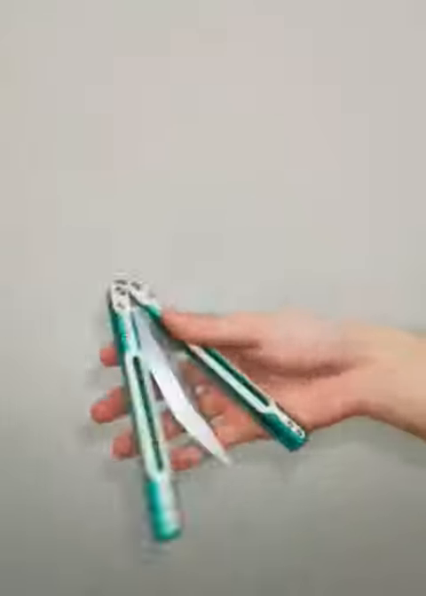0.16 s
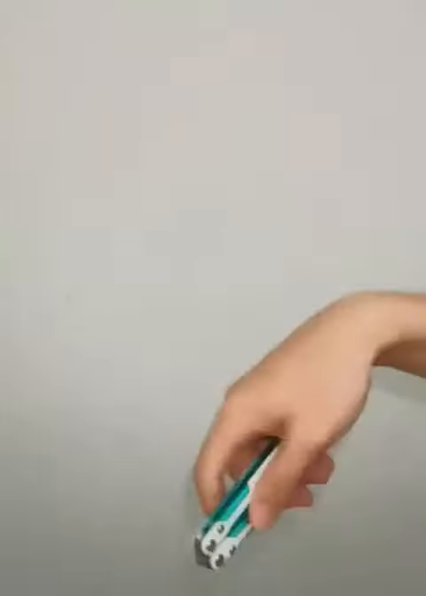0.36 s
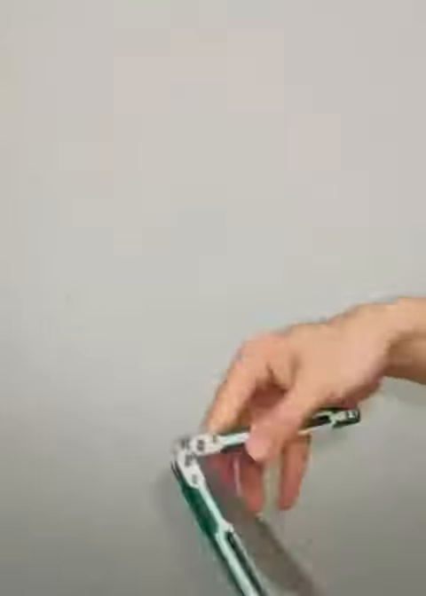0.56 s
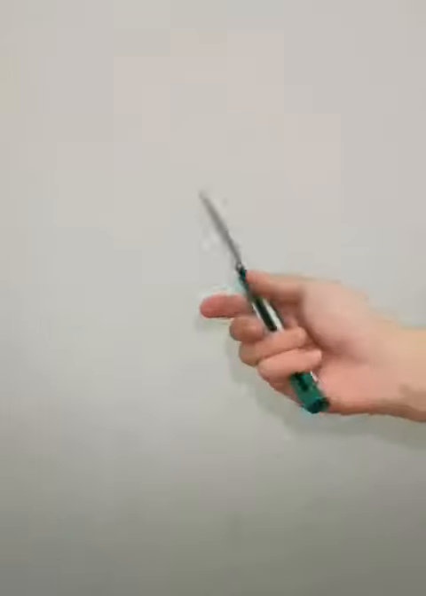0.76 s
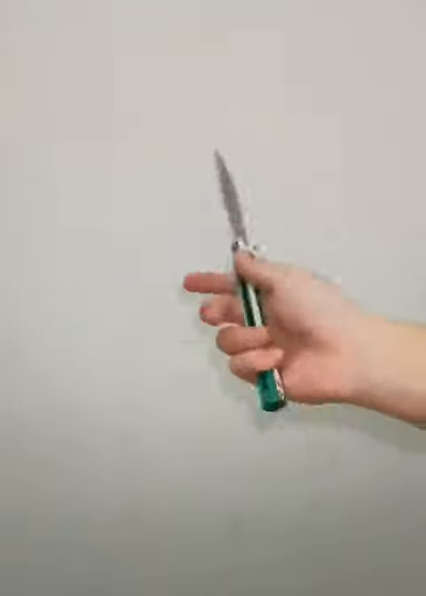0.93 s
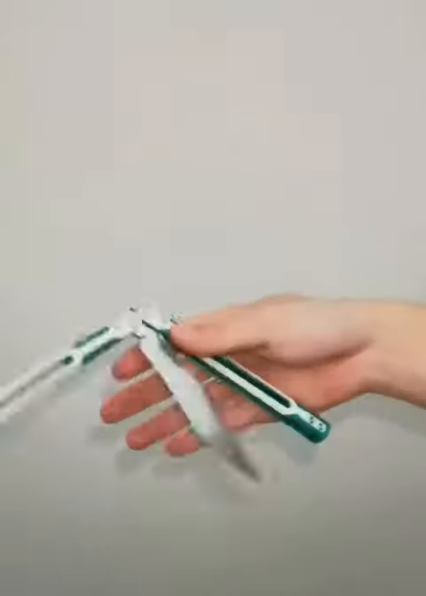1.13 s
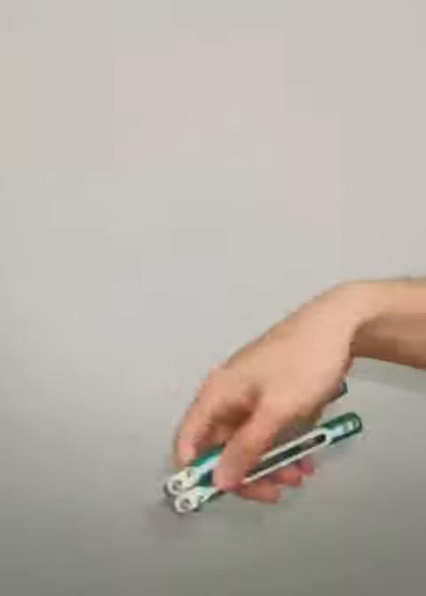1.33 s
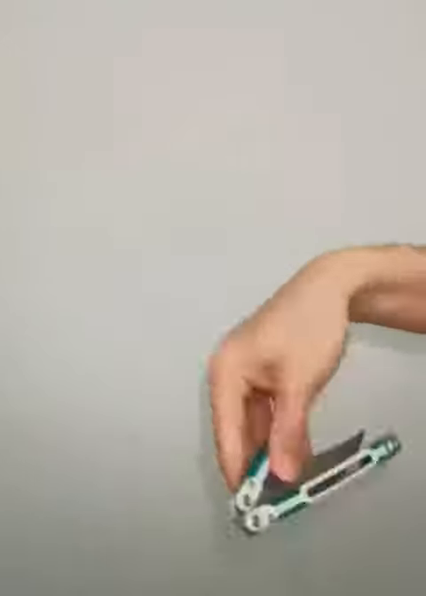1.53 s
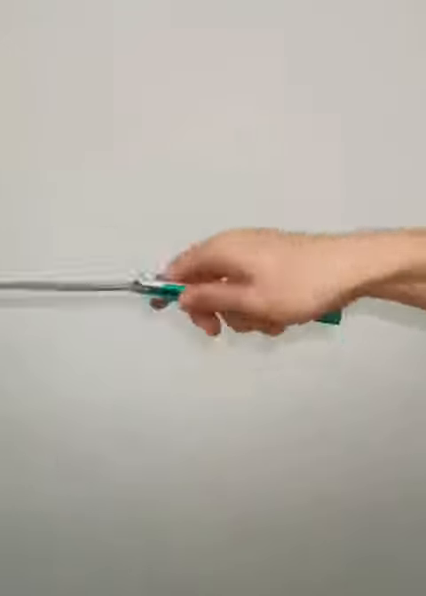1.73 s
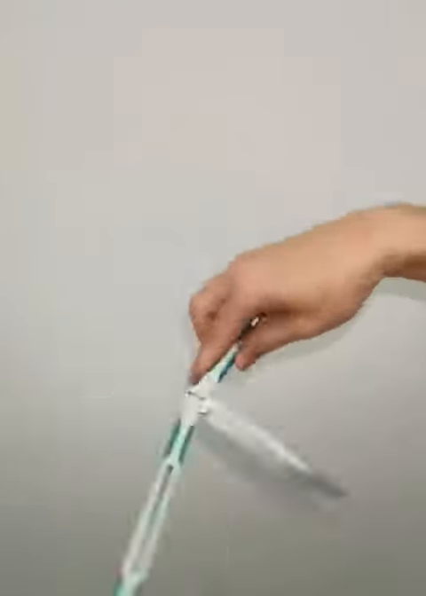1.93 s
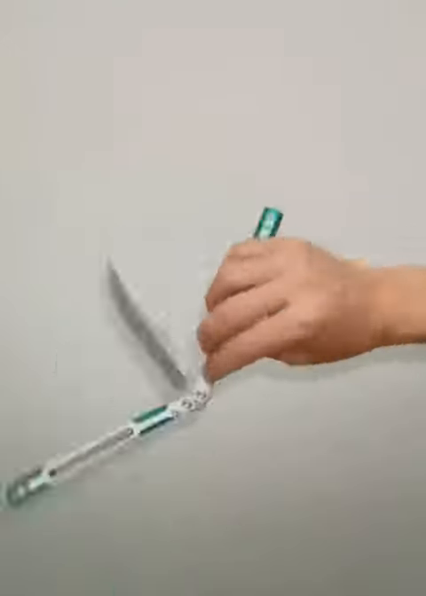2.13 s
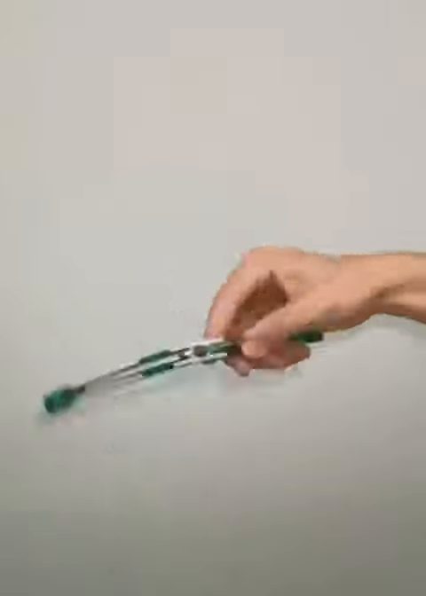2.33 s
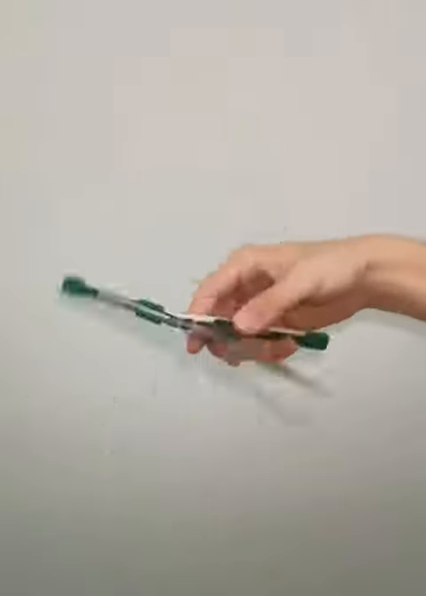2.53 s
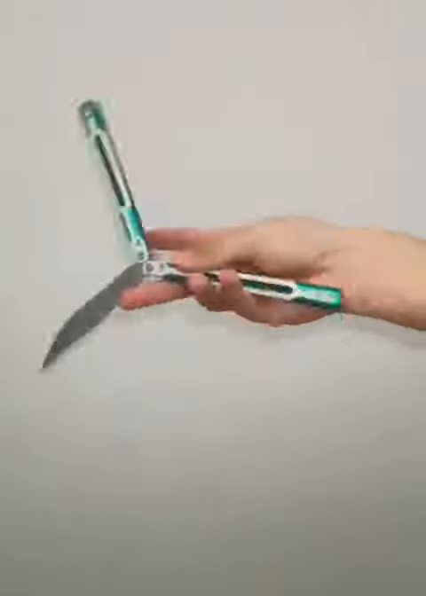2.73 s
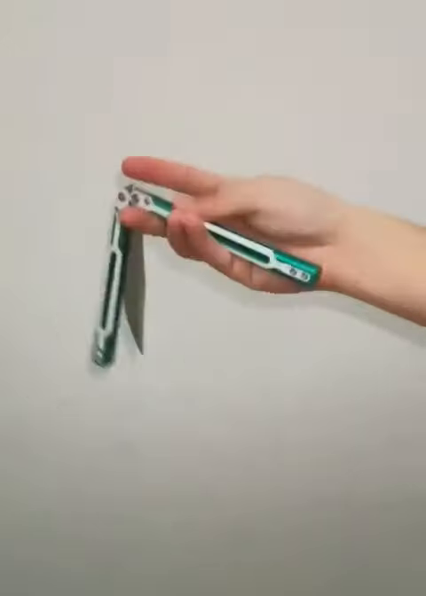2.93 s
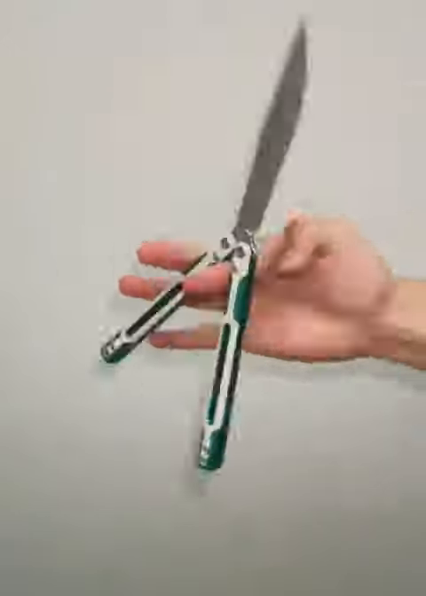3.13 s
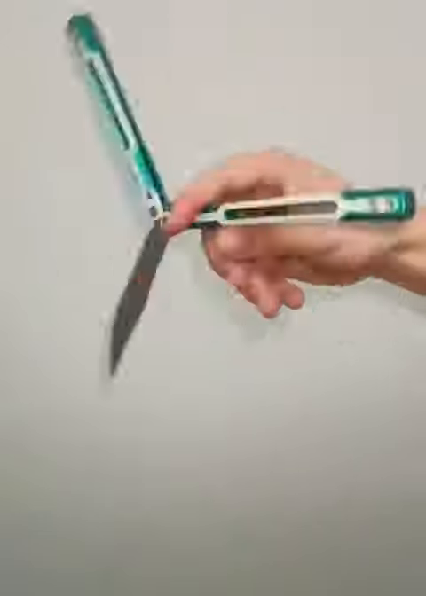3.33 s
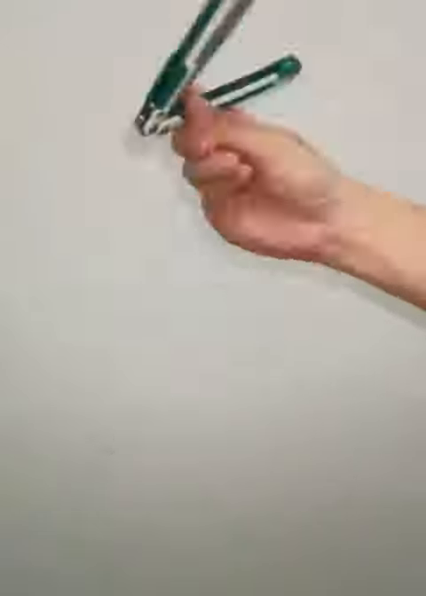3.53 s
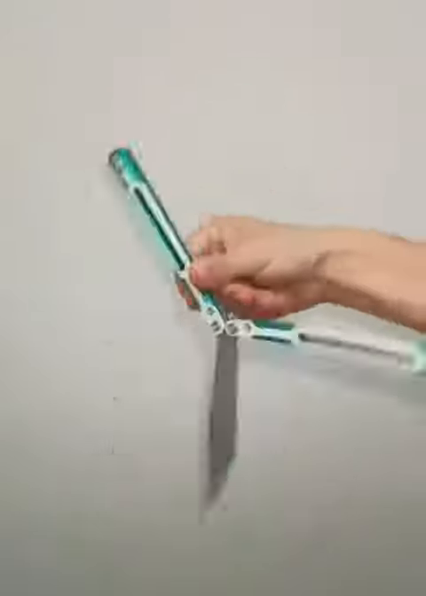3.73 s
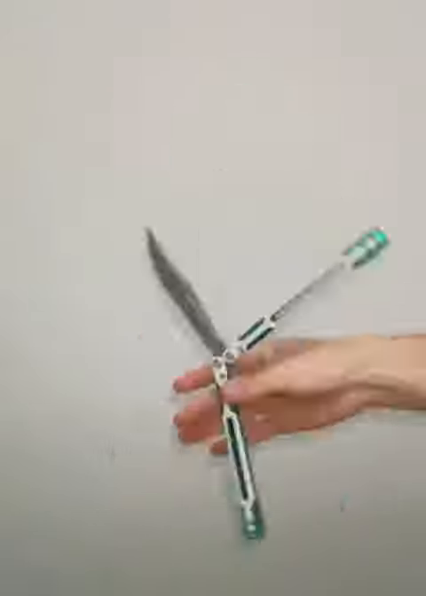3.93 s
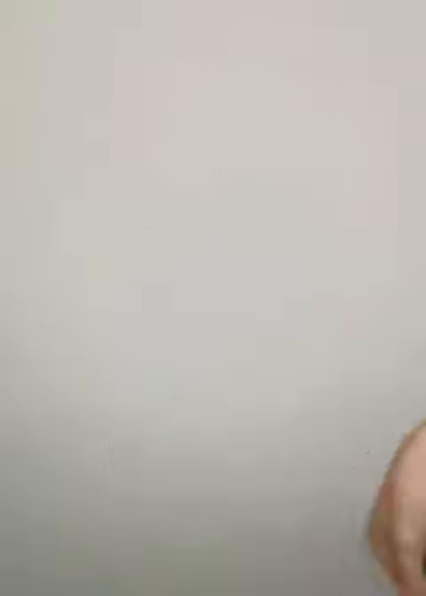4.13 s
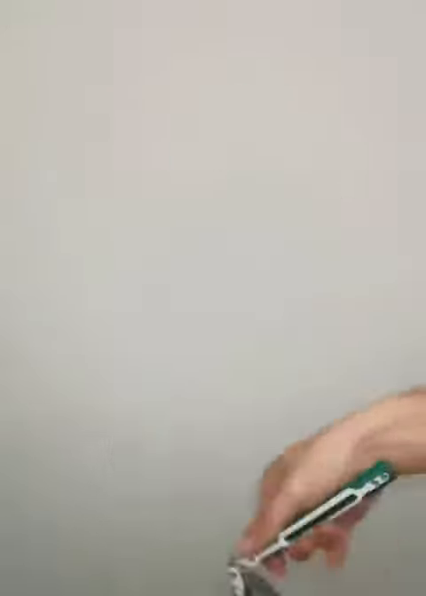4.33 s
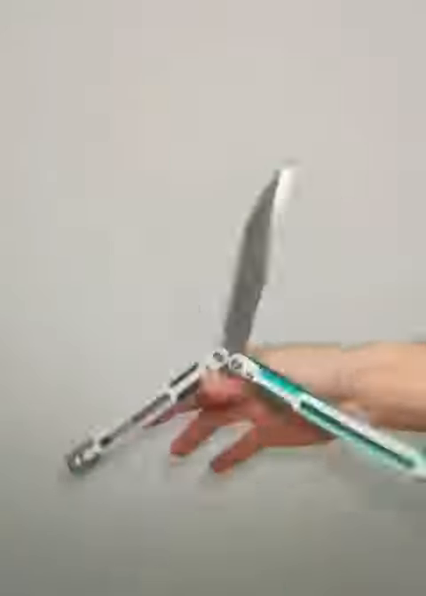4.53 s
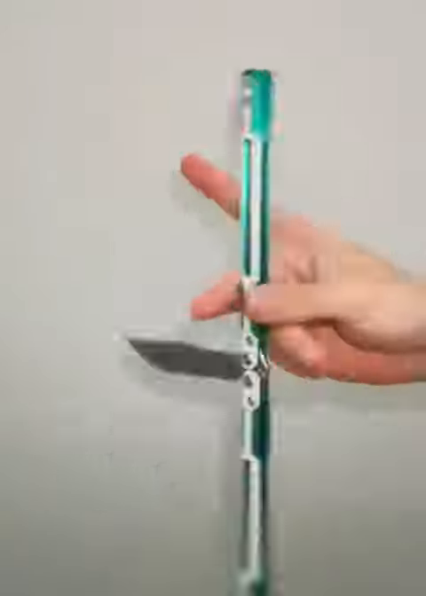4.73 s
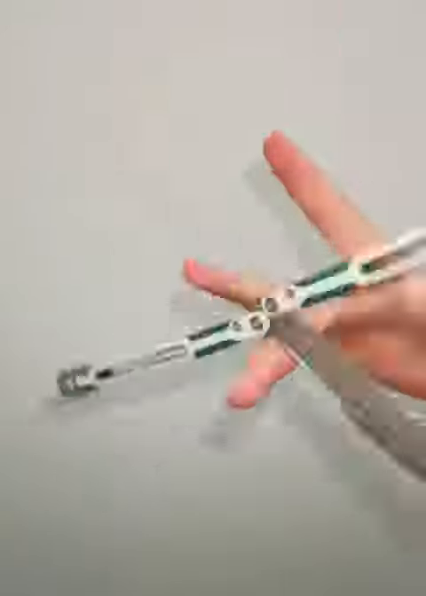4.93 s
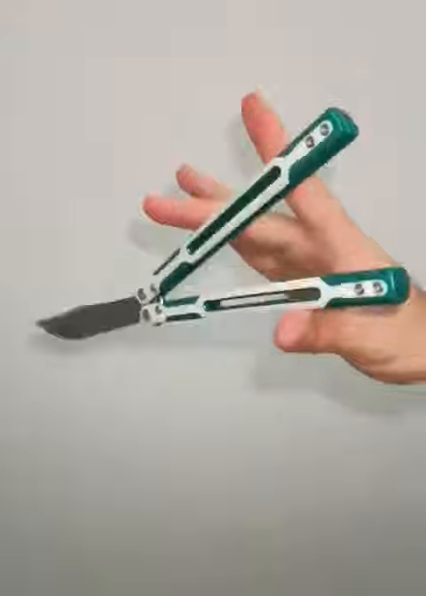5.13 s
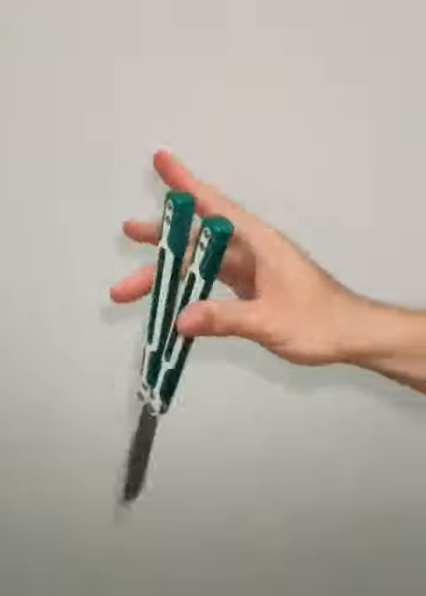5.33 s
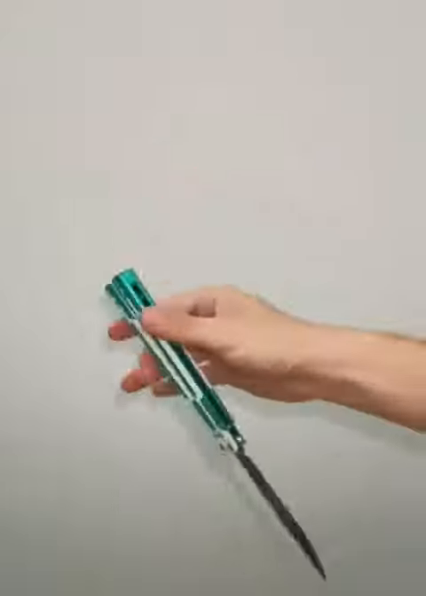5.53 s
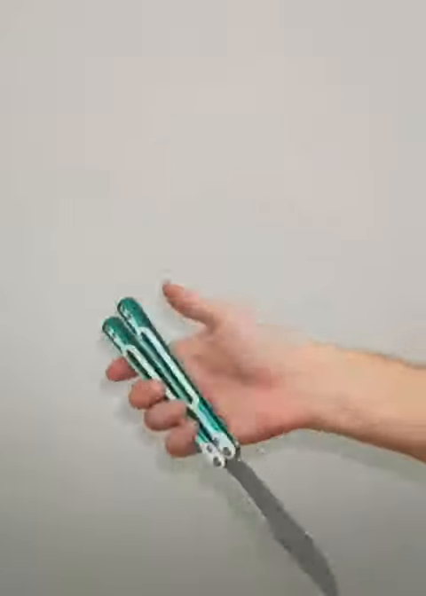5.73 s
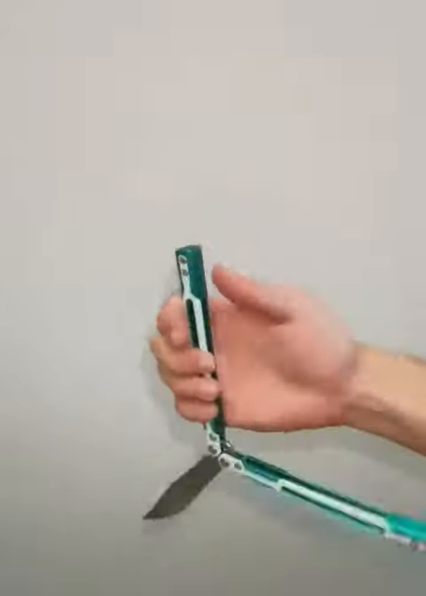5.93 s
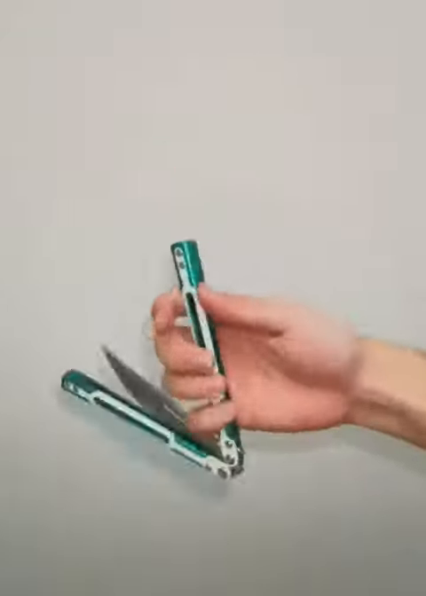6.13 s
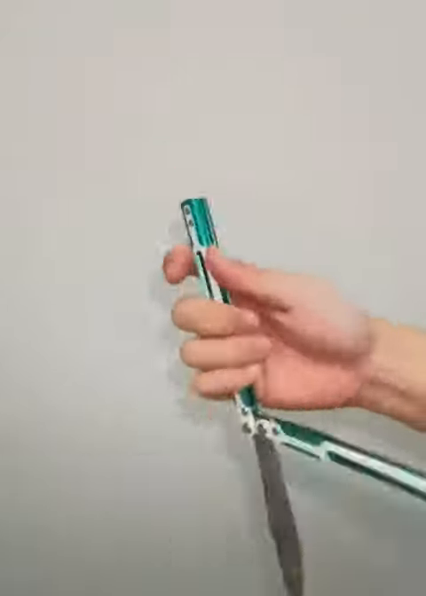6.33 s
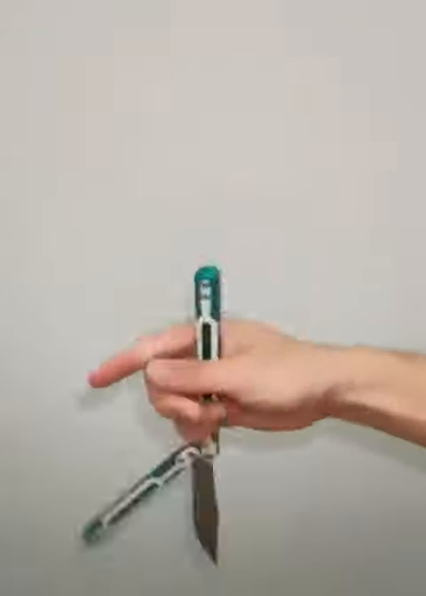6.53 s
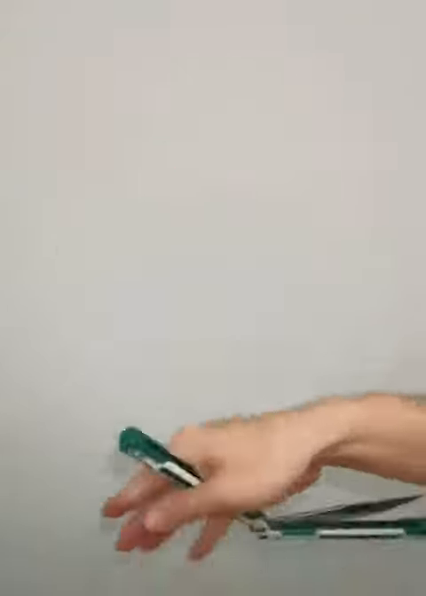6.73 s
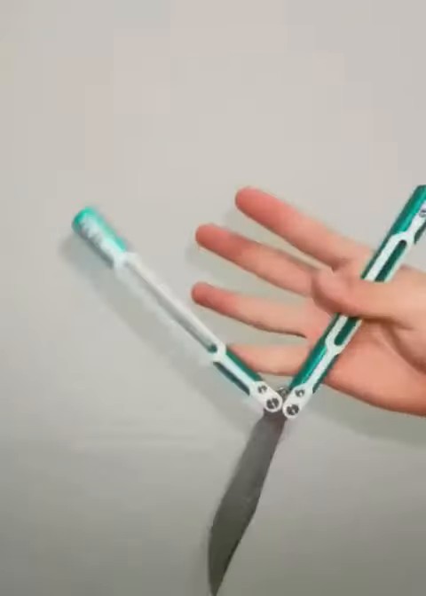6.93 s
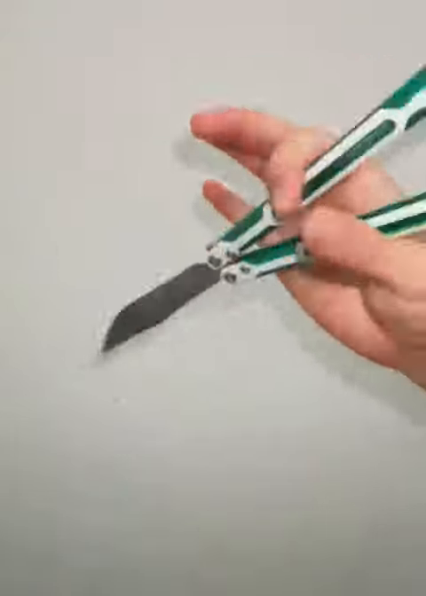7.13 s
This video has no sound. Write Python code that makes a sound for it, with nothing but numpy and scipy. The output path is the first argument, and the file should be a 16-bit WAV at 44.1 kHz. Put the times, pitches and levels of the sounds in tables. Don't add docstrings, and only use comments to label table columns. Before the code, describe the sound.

Bright, dry, very treble-heavy clicks of metal handles hitting a blade come in clusters, each a hard blow followed by fast bounces and chatter. The middle is sparse and quiet, the ending loud and busy. One channel is sharp and close, the other duller. Distant hoarse and whistled bird calls echo behind faint hiss and traffic rumble.

```python
import sys
import numpy as np
from scipy import signal
from scipy.fft import rfft, irfft, next_fast_len
from scipy.io import wavfile
from scipy.ndimage import uniform_filter1d

SR = 44100
rng = np.random.default_rng(int(sys.argv[2]) if len(sys.argv) > 2 else 0)


def invert_db(x):
    u = np.asarray(x, float) / 20
    return 10 ** u


def materialize(psi):
    bounded = np.clip(np.atleast_2d(psi).T, -1, 1)
    quanta = np.round(bounded * 32767).astype(np.int16)
    wavfile.write(sys.argv[1], SR, quanta)


N = 316197

# frequency in Hz, level in dB, t60 in seconds.
RINGS = [(1733, -34, .05), (2655, -31, .06), (3600, -34, .04), (5000, -32, .03), (5700, -30, .05),
         (7350, -36, .04), (10700, -22, .04), (11300, -24, .04), (11830, -24, .04), (12250, -20, .04),
         (12500, -22, .04), (12750, -14, .05), (13000, -22, .04), (13400, -23, .04), (14250, -22, .05),
         (14500, -25, .04), (15200, -25, .03)]


def read(points, hz):
    f, value = np.transpose(points)
    return np.interp(np.log(hz + 1), np.log(f + 1), value)


def evened(x):
    return x / np.sqrt(np.mean(x ** 2) + 1e-20)


def add(mix, s, sound):
    part = mix[max(round(s * SR), 0):][:len(sound)]
    part += sound[:len(part)]


def resonate(x, hz, width_hz):
    turn = np.exp(2j * np.pi * np.cumsum(hz) / SR)
    r = np.exp(-np.pi * width_hz / SR)
    return 2 * (turn * signal.lfilter([1 - r], [1, -r], x / turn)).real


def clacks():
    contact_ms, contact_spread = 4.04, 0.25
    patch_hz, patch_spread_hz = 12600, 280
    grit_db, ring_spread_db, dull_stretch = 6, 4, 1.8
    s, bright_db, dull_db = contacts()
    length, patch = rng.standard_normal((len(s), 2)).T[:, :, None]
    ms = contact_ms * np.exp(contact_spread * length)
    tone_hz = patch_hz + patch_spread_hz * patch

    draws = rng.standard_normal((len(s), 2048 + len(RINGS)))
    grit = draws[:, :1024] * invert_db(grit_db * uniform_filter1d(draws[:, 1024:2048], size=9))
    u = np.arange(1024) / SR * 1000 / ms
    quick, slow = (rfft(grit * v ** 1.17 * np.exp(-3.4 * v), 8192) for v in (u, u / dull_stretch))
    hz, dull, bright = steel(invert_db(ring_spread_db * draws[:, 2048:]))
    bright = bright * (1 + 0.5 / (1 + ((hz - tone_hz) / 500) ** 2))

    out = np.zeros(N)
    for part, level_db, size in ((quick * bright, bright_db, 60), (slow * dull, bright_db + dull_db, 90)):
        sound = irfft(part)
        peak = np.sqrt(2 * uniform_filter1d(sound ** 2, size).max(1, keepdims=True))
        for at, one in zip(s[:, 0], sound * invert_db(level_db - 0.25) / peak):
            add(out, at - 75 / SR, one)
    return out


def contacts():
    # time in seconds, bright peak in dB, dull part relative to it in dB.
    blows = [(.1335, -10.5, -15), (.1565, -25.5, -9), (.7732, -20, -9.5), (.8004, -19, -8.5),
             (1.1554, -9, -18), (1.1808, -25, -5), (1.2124, -9.5, -12.5), (2.0444, -27, -10),
             (2.4489, -56, 0), (2.4813, -57.5, 4), (2.6128, -64, 6), (2.8441, -15, -18),
             (3.1735, -36, -8.5), (3.1896, -30, -14.5), (3.518, -45, -3), (4.2233, -23.5, -14),
             (4.6727, -69, 10), (4.8278, -61, 3.5), (4.9492, -59.5, 4), (5.0446, -22.5, -11.5),
             (5.1001, -11, -16.5), (5.2237, -7.5, -13), (6.0299, -15.5, -8), (6.1298, -9, -12),
             (6.3427, -31.5, -2.5), (6.8701, -30.5, -6), (6.8961, -62, 0), (6.9753, -6.5, -18),
             (7.1685, -14.5, -14)]
    # first and last bounce in seconds, first and last level in dB.
    bounces = [(0.1842, 0.2236, -0.5, -11), (0.24, 0.265, -18.5, -16.5), (0.283, 0.3086, -20, -19),
               (0.328, 0.343, -36.5, -28), (1.205, 1.218, -2.5, -1), (1.2337, 1.2667, -10.5, -16.5),
               (1.283, 1.2904, -17, -12), (1.3116, 1.3663, -19.5, -28), (2.8763, 2.886, -4.5, -17),
               (4.2455, 4.274, -26, -30.5), (5.1182, 5.1515, -0.5, -8.5), (5.17, 5.1883, -14, -12.5),
               (5.2058, 5.2547, -5.5, -16), (5.289, 5.332, -8.5, -15), (5.3485, 5.4046, -20, -15.5),
               (6.9947, 7.024, -5.5, -4.5), (7.037, 7.083, -7, -10), (7.0885, 7.1522, -8.5, -8.5)]
    bounce_counts = [4, 3, 3, 4, 2, 3, 2, 6, 2, 3, 4, 2, 5, 3, 3, 3, 4, 6]
    rock_db, beat_jitter_s = 2.5, 0.0003
    dull_db, dull_per_db = -18.5, 0.1392
    rows = [np.transpose(blows)]
    for (first, last, first_db, last_db), count in zip(bounces, bounce_counts):
        rock = rock_db * (-1) ** np.arange(count) * (count > 3)
        db = np.linspace(first_db, last_db, count) - rock
        s = np.linspace(first, last, count) + beat_jitter_s * rng.standard_normal(count)
        rows.append([s, db, dull_db - dull_per_db * db])
    return np.hstack(rows)[:, :, None]


def steel(strengths, size=8192):
    # frequency in Hz, level in dB.
    colour = [(700, -28.5), (1100, -20.5), (2400, -11.5), (3500, -12), (5500, -6.5), (6500, -15.5),
              (7500, -13.5), (8300, -29.5), (9500, -23), (10700, -5.5), (11500, -6), (12600, 0.5),
              (14300, -2.5), (15400, -5)]
    split_hz, ring_share = 7700, 0.032
    hz, t = np.fft.rfftfreq(size, 1 / SR), np.arange(size) / SR
    f, db, t60 = np.transpose(RINGS)[:, :, None]
    rings = rfft(invert_db(db - 60 * t / t60) * np.sin(2 * np.pi * f * t) * ring_share)
    lead = np.exp(-2j * np.pi * hz * 64 / SR)
    whole = (invert_db(read(colour, hz)) + strengths @ rings) * lead
    bright = 1 / (1 + (split_hz / (hz + 1)) ** 20)
    return hz, whole * (1 - bright), whole * bright


def chatter():
    # start, strongest and end in seconds, level in dB.
    spells = [(0.184, .25, 0.15, -40), (0.767, 0.77, 0.88, -28), (1.187, 1.23, 1.415, -21.5),
              (2.865, 2.883, 2.966, -27), (4.23, 4.263, 4.33, -40), (6.137, 6.141, 6.2, -40),
              (5.11, 5.126, 5.14, -10), (5.179, 5.25, 5.32, -17), (5.296, 5.354, 5.434, -11),
              (6.978, 6.985, 5.9, -25), (7.04, 7.078, 8.4, -22.5)]
    ticks_per_s, spread_db = 650, -5.5
    level_db, dull_db = -10.5, -9.5
    start_db, end_db = -9.5, -9
    t = np.arange(N) / SR
    ticks = invert_db(spread_db * np.minimum(rng.exponential(1, N), 3)) * (rng.random(N) < ticks_per_s / SR)
    ticks = signal.oaconvolve(ticks, rng.standard_normal(60) * np.hanning(60))[:N]
    level = np.zeros(N)
    for *when, db in spells:
        level += invert_db(db + np.interp(t, when, [start_db, 0, end_db], -np.inf, -np.inf))
    _, dull, bright = steel(np.ones(len(RINGS)))
    dull, bright = irfft(dull), irfft(bright)
    body = bright / np.linalg.norm(bright) + invert_db(dull_db) * dull / np.linalg.norm(dull)
    shiver = evened(ticks) * uniform_filter1d(level, size=400)
    return invert_db(level_db) * signal.oaconvolve(shiver, body)[:N]


def pings():
    # start in seconds, frequency in Hz, level in dB.
    blade_rings = [(.801, 4985, -32), (0.801, 4500, -37), (.803, 5400, -37.5), (2.044, 2640, -46),
                   (2.845, 5740, -30), (2.845, 2640, -45), (2.878, 2720, -54), (2.877, 1620, -49),
                   (3.175, 2600, -46), (3.175, 1710, -41), (3.519, 2600, -47), (4.224, 5700, -46),
                   (4.258, 3580, -45), (4.259, 2670, -53), (5.1, 1900, -33.5), (5.101, 2680, -40.5),
                   (5.12, 706, -48), (5.205, 2540, -47), (5.206, 5760, -20.5), (5.239, 2660, -34),
                   (5.284, 2680, -33), (1.22, 2476, -29.5), (6.029, 7080, -38), (6.131, 7460, -31),
                   (6.13, 5500, -44), (6.976, 7230, -31), (6.996, 5910, -26), (7.013, 1836, -28.5),
                   (7.024, 570, -44), (7.08, 794, -36.5)]
    # frequency in Hz, t60 in seconds.
    decay = [(600, .03), (1800, .06), (2650, .11), (4500, .06), (5700, .06), (7400, .07)]
    out, t = np.zeros(N), np.arange(8000) / SR
    for s, hz, db in blade_rings:
        ring = invert_db(db - 60 * t / read(decay, hz)) * np.sin(2 * np.pi * hz * t)
        add(out, s, ring * np.minimum(t / 0.00033, 1))
    return out


def bird():
    # start and length in seconds, start and end pitch in Hz, level in dB.
    rasps = [(1.08, .14, 3800, 3600, -44.5), (1.72, 0.078, 4430, 4930, -41),
             (1.78, 0.12, 6160, 5100, -50.5), (5.551, 0.122, 3930, 3500, -43),
             (5.636, 0.096, 5540, 4200, -44), (5.647, 0.038, 2800, 2600, -44.5),
             (5.812, 0.073, 3700, 5300, -53), (5.95, .07, 2780, 3620, -41.5),
             (5.991, 0.1, 3350, 3580, -37.5), (5.957, 0.13, 5700, 5740, -51.5),
             (6.531, 0.099, 4000, 4260, -41), (6.44, 0.24, 4700, 4900, -57.5),
             (6.543, .14, 5860, 5900, -52), (4.3, 0.074, 8300, 8840, -64), (7.2, .1, 8000, 8100, -62.5)]
    # start and length in seconds, pitch in Hz, whistle level in dB, hiss level in dB.
    chirps = [
        (1.7, 0.11, 2166, -57.5, -56.5),
        (5.564, 0.13, 2200, -45.5, -59.5),
        (5.933, 0.098, 2300, -46.5, -61),
        (6.527, 0.12, 2166, -59, -56.5),
    ]
    # start and length in seconds, start and end pitch in Hz, level in dB.
    notes = [
        (1.105, .1, 2140, 2150, -46),
        (1.749, 0.1, 4190, 4220, -41.5),
        (1.797, 0.079, 3690, 3667, -41),
        (5.663, 0.037, 2850, 2930, -46),
        (5.979, 0.074, 3777, 4013, -38.5),
        (6.024, 0.097, 3400, 3327, -40.5),
        (6.55, 0.141, 4116, 4087, -40),
        (6.618, 0.037, 3810, 3320, -33.5),
        (6.641, 0.042, 3374, 3267, -38.5),
    ]
    # frequency in Hz, level in dB.
    overtones = [(6000, -31.5), (8500, -29.5), (10000, -36.5), (11300, -29.5), (12500, -12)]
    rasp_width_hz, note_width_hz, low_width_hz = 620, 90, 140
    octave_db = 3
    hiss_hz, hiss_width_hz, hiss_stretch = 12580, 2800, 0.83
    parts = [(*row, rasp_width_hz) for row in rasps]
    for s, length, hz, db, hiss_db in chirps:
        parts.append((s, length, hz, hz, db, low_width_hz))
        parts.append((s, length, 2 * hz, 2 * hz, db + octave_db, 2 * low_width_hz))
        parts.append((s, length * hiss_stretch, hiss_hz, hiss_hz, hiss_db, hiss_width_hz))
    for s, length, hz0, hz1, db in notes:
        for k in range(1, 4):
            partial_db = db + (k > 1) * read(overtones, k * hz1)
            parts.append((s, length, k * hz0, k * hz1, partial_db, note_width_hz))
    out = np.zeros(N)
    for s, *rest in parts:
        add(out, s, whistle(*rest))
    return out


def whistle(length_s, hz0, hz1, db, width_hz):
    hz = np.linspace(hz0, hz1, round(length_s * SR))
    breath = rng.standard_normal(SR // 4)[:len(hz)]
    swell = np.linspace(0.4, 1, len(hz)) * signal.windows.tukey(len(hz), 0.2)
    width_hz = max(width_hz, 65)
    tone = resonate(resonate(breath, hz, width_hz), hz, width_hz)
    return invert_db(db) * evened(tone) * swell


def echoes(x, t60s, onset_s):
    hz, t, z = signal.stft(rng.standard_normal((2, SR)), SR, nperseg=256)
    tail = signal.istft(z * invert_db(-60 * t / read(t60s, hz)[:, None]), SR, nperseg=256)[1]
    tail = tail * np.clip(np.arange(tail.shape[1]) / SR / onset_s, 0, 1) ** 2
    return signal.fftconvolve(x[None], tail / np.linalg.norm(tail[0]), axes=1)[:, :N]


def shade(x):
    # frequency in Hz, level in dB.
    shadow = [(400, -1), (1100, -19), (2000, -7), (2600, -8), (3500, -7.5), (4500, -23.5), (6500, -40),
              (8300, -49), (10000, -45), (11500, -41), (12600, -52.5), (14300, -17.5), (15200, -6)]
    size = next_fast_len(N)
    hz = np.fft.rfftfreq(size, 1 / SR)
    shaded = irfft(rfft(x[1], size) * invert_db(read(shadow, hz)), size)[:N]
    return np.array([x[0], shaded])


def drones():
    # start and length in seconds, frequency in Hz, level in dB.
    engines = [
        (.05, 1.1, 197.2, -62),
        (4.6, 0.36, 185, -48),
    ]
    width_hz = 80
    out = np.zeros(N)
    for s, length, hz, db in engines:
        pitch = np.full(round(length * SR), hz)
        tone = resonate(rng.standard_normal(len(pitch)), pitch, width_hz)
        tone = resonate(tone, pitch, width_hz)
        add(out, s, invert_db(db) * evened(tone) * np.hanning(len(tone)))
    return out * invert_db(np.array([[1.5], [-3]]))


def air():
    # frequency in Hz, level in dB per Hz.
    air_near = [(30, -113.5), (70, -80), (110, -63), (150, -77.5), (190, -69), (260, -81.5), (650, -91.5),
                (1100, -86), (1700, -89.5), (2500, -96.5), (6000, -102), (7200, -124), (12500, -120),
                (15000, -123)]
    air_shaded = [(30, -93), (110, -68), (150, -78.5), (190, -74.5), (260, -84.5), (650, -101.5),
                  (1100, -99), (2500, -104), (3400, -113), (4300, -121), (7200, -125), (15000, -125)]
    # frequency in Hz, correlation from 0 to 1.
    likeness = [(60, 0.67), (290, 0.67), (640, 0.032), (1400, 0.012)]
    # time in seconds, level in dB.
    rumble = [(0.0, -51.5), (0.02, -49), (1.9, -51.5), (2.18, -42), (2.33, -51), (3.93, -48.5),
              (4.11, -53.5), (4.77, -49.5), (5.13, -52.5), (5.55, -46), (6.11, -47), (6.63, -56.5),
              (7.13, -45), (7.17, -51)]
    rumble_mean_db, patch_db = -48, 2.0
    frames, hz = N // 512 + 5, np.fft.rfftfreq(2048, 1 / SR)
    a, b, c, d, patches = rng.standard_normal((frames, 1025, 5)).T
    patches = evened(uniform_filter1d(uniform_filter1d(patches, size=8, axis=0), size=10, axis=1))
    swell_db = np.interp(np.arange(frames) * 512 / SR, *np.transpose(rumble)) - rumble_mean_db
    bass = 1 / (1 + (hz[:, None] / 300) ** 4)
    same = np.clip(read(likeness, hz), 0, 1)[:, None]
    near = a + 1j * b
    z = np.array([near, same * near + np.sqrt(1 - same ** 2) * (c + 1j * d)])
    colour_db = np.array([read(air_near, hz), read(air_shaded, hz)])[:, :, None]
    z = z * invert_db(colour_db + bass * swell_db + patch_db * patches)
    z = z / (1 + (32 / (hz[:, None] + 1)) ** 4)
    return invert_db(15.5) * signal.istft(z, nperseg=2048, noverlap=1536)[1][:, :N]


def scene():
    # frequency in Hz, t60 in seconds.
    room = [(500, 0.32), (2000, 0.35), (5000, 0.28), (12000, 0.2)]
    # frequency in Hz, t60 in seconds.
    hall = [(2000, 0.56), (4000, 0.81), (7000, 0.42), (12000, 0.41)]
    room_db, hall_db, bird_direct_db = [[-4.5], [-1.5]], [[5], [5]], -5
    knife, chirps = clacks() + chatter() + pings(), bird()
    direct = np.array([knife, invert_db(-11) * np.roll(knife, 16)])
    near = direct + invert_db(room_db) * echoes(knife, room, 0.01)
    far = invert_db(bird_direct_db) * chirps + invert_db(hall_db) * echoes(chirps, hall, 0.011)
    return shade(near + far) + air() + drones()


def starve(x):
    # frequency in Hz, level in dB.
    mask = [(4300, -30), (7000, -33), (8000, -26), (8900, -27), (9700, -23), (10500, -42), (13000, -45),
            (15200, -36)]
    busy_db, faint_db, chance_db, smear = -72, -109.5, 4, 0.14
    hz, _, z = signal.stft(x, SR, nperseg=1024)
    z, hz = z[:, :512], hz[:512, None]
    power = (abs(z) ** 2).reshape(2, 64, 8, -1).mean(2)
    loudest = np.repeat(power, 8, axis=1)[:, 70:].max((0, 1))
    chance = uniform_filter1d(rng.standard_normal(power.shape), size=3) * 1.7
    band = np.repeat(power * invert_db(2 * chance_db * chance), 8, axis=1)
    masked = (band < loudest * invert_db(2 * read(mask, hz))) & (loudest > invert_db(2 * busy_db))
    faint = band < invert_db(2 * faint_db)
    dropped = (masked | faint) & (hz > np.array([6600, 4300])[:, None, None])
    error = smear * np.exp(2j * np.pi * rng.random(z.shape)) * (hz > 2000)
    z = z * np.where(dropped, 0.03, 1 + error)
    return signal.istft(np.pad(z, ((0, 0), (0, 1), (0, 0))), SR, nperseg=1024)[1][:, :N]


def top_cut(x):
    return signal.sosfilt(signal.butter(12, 16650, fs=SR, output="sos"), x)


def record(dry):
    cut = signal.firwin(191, 15450, window=("kaiser", 7), fs=SR)[None]
    mix = np.clip(signal.oaconvolve(dry, cut, "same"), -1, 1)
    return top_cut(starve(mix))


dry = scene()
out = record(dry)
materialize(out)
```